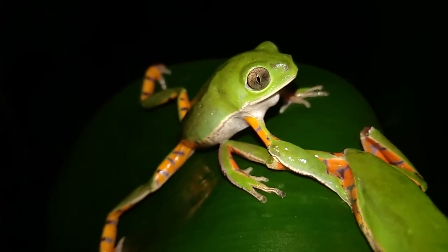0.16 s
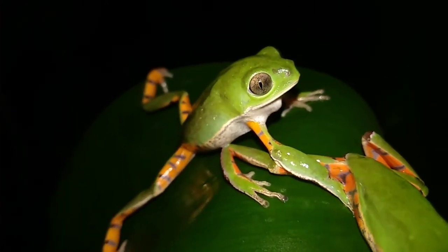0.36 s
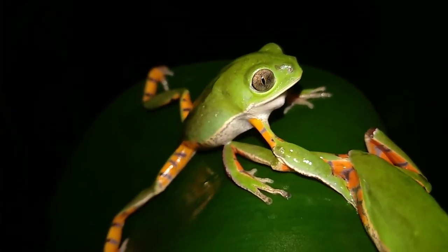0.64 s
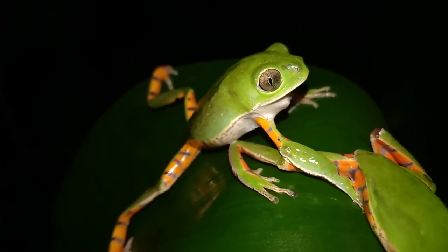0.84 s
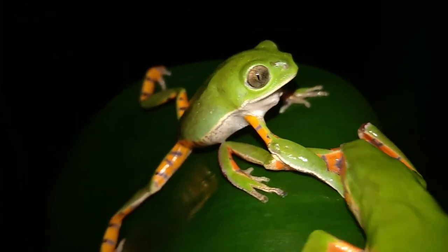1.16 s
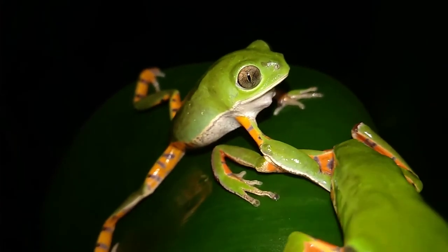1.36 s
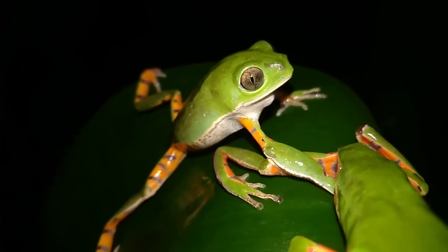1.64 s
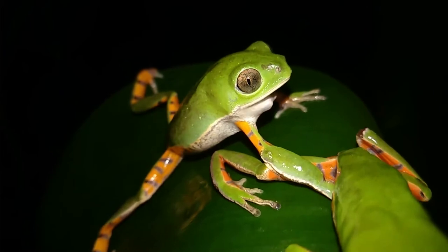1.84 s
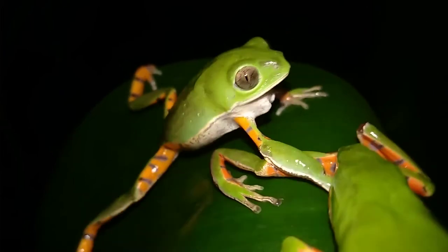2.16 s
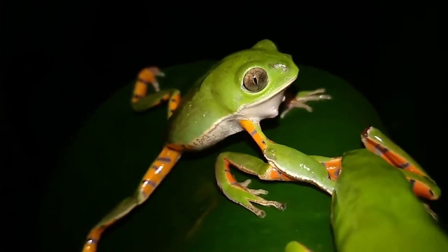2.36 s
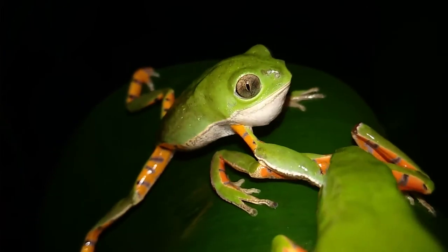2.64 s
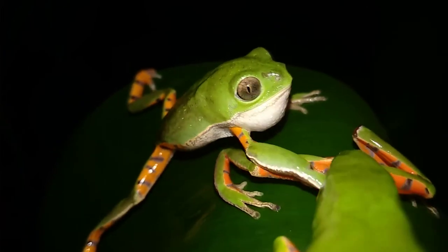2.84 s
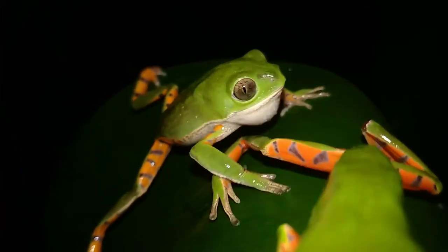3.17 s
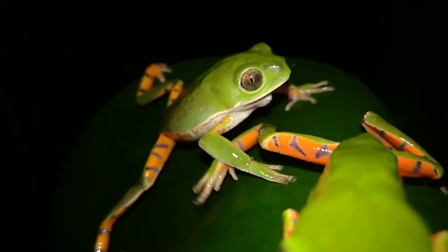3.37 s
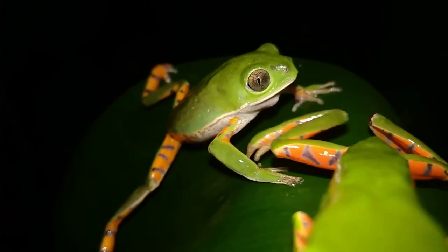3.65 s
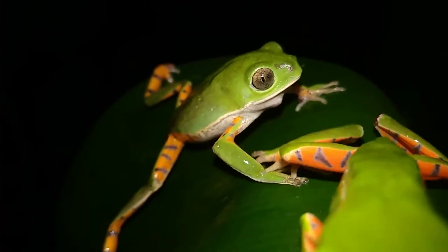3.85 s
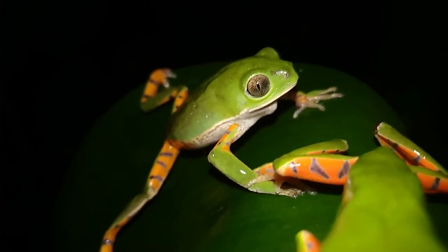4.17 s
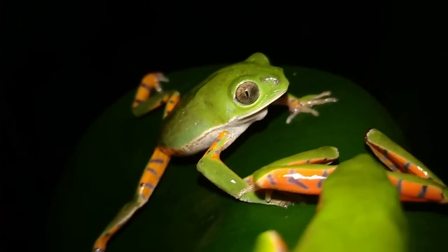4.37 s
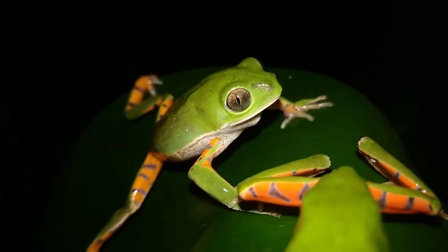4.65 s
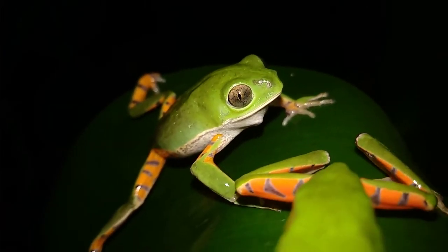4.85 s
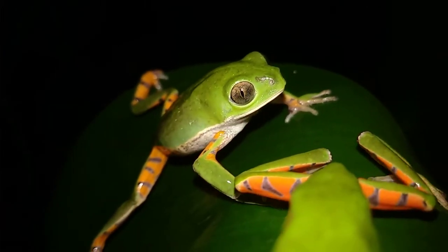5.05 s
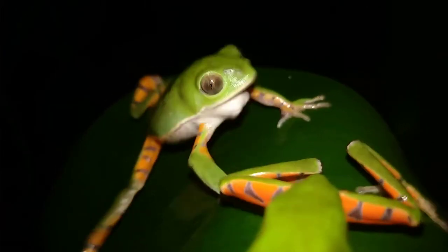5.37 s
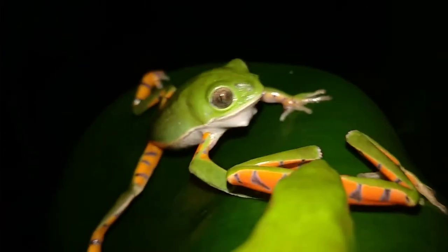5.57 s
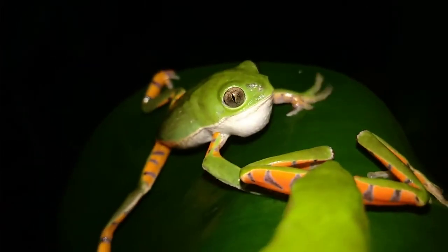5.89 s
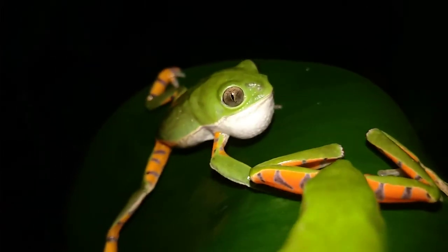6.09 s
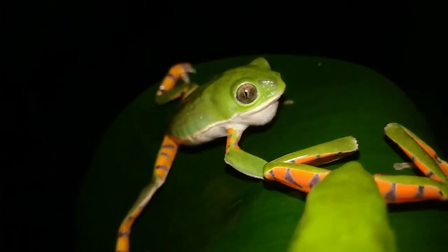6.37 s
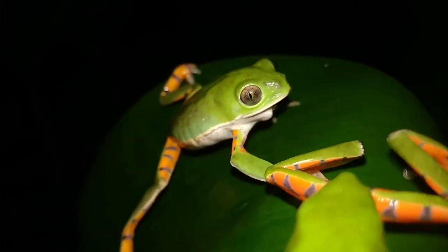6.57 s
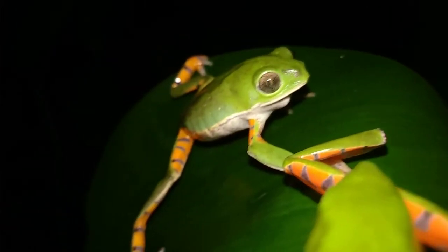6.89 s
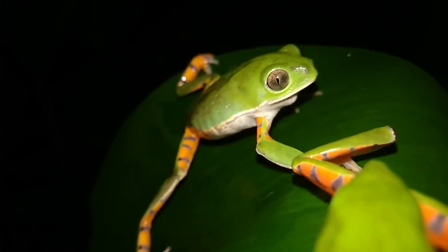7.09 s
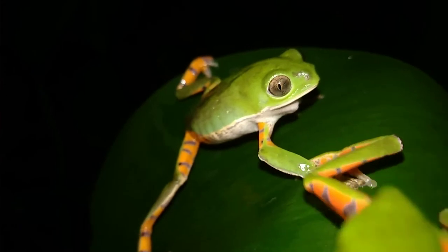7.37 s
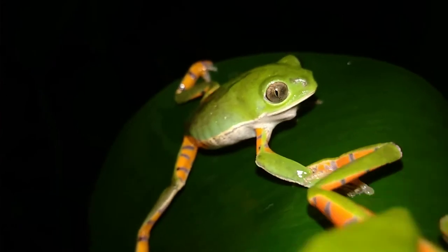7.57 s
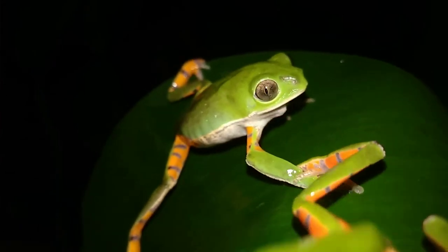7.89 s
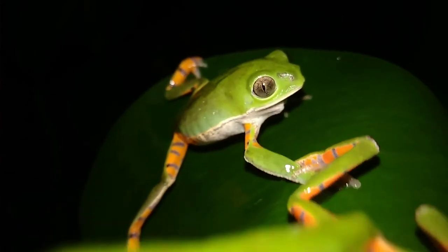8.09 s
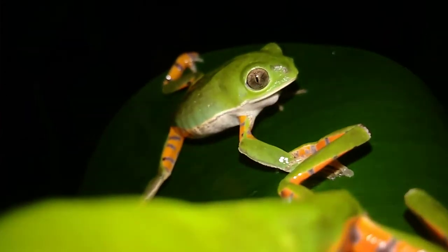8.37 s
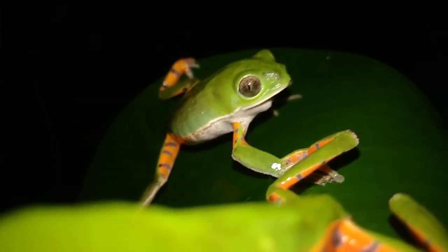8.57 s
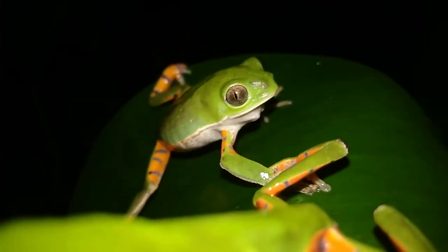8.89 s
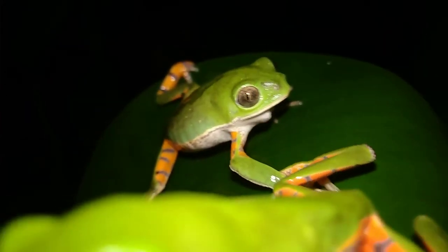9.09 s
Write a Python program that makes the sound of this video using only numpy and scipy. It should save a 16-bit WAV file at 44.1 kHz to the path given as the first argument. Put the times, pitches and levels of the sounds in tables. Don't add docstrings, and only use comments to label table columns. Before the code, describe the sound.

A thin, steady insect buzz fills the night while a katydid hisses in airy bursts from the left. A near frog repeats very short, dry, rattling croaks, eleven in all, well under a second apart at first. Faint echoing chirps come from frogs far to the left. A tree frog on the right answers with two rolling trills, the second louder. Leaves rustle lightly in the third second. Stereo outdoor pickup, faint hiss.

```python
import sys
import numpy as np
from scipy import signal
from scipy.fft import rfft, irfft
from scipy.io import wavfile
from scipy.ndimage import uniform_filter1d

SR = 44100
rng = np.random.default_rng(int(sys.argv[2]) if len(sys.argv) > 2 else 0)


def int16_out(signal):
    q = np.round(np.clip(np.atleast_2d(signal).T, -1, 1) * 32767)
    wavfile.write(sys.argv[1], SR, q.astype(np.int16))


def volts(x):
    e = np.asarray(x, float) / 20
    return 10 ** e


N = 407043
TIME = np.arange(N) / SR
OPPOSITE = np.array([[1], [-1]])

# frequency in Hz, density in dB per Hz.
AIR_SPECTRUM = [(28, -30), (55, 5.5), (110, -2.5), (650, -15.5), (1600, -21.5), (4500, -20), (8330, -18.5),
                (15500, -30.5)]
# time in seconds, level in dB.
ENGINE_LEVEL = [(0.0, -79), (2.4, -70.5), (4.5, -70), (5.2, -75.5), (9.23, -104)]
# time in seconds, wing strokes per second.
WING_RATE = [(0.0, 157.8), (1.5, 156.33), (2.5, 155.99), (3.5, 156.32), (4.0, 156.9), (4.5, 158.46),
             (5.0, 159.1), (5.5, 159.33), (6.3, 158.95), (8.0, 156.91), (9.0, 156.24), (9.23, 156.23)]
# time in seconds, level in dB.
BUZZ_LEVEL = [(0.0, -53.5), (1.49, -51.5), (4.47, -52.5), (4.52, -48.5), (4.86, -54), (6.66, -49.5),
              (7.1, -55), (7.4, -51), (9.15, -52.5), (9.23, -53.5)]
# frequency in Hz, density in dB per Hz.
WING_SPECTRUM = [(3350, -40), (5700, -30.5), (6350, -8), (6800, -1.5), (7000, -2), (7500, -6), (8200, -39),
                 (12000, -51.5)]
# start in seconds, peak level in dB, pitch in Hz, left minus right in dB.
LOW_CALLS = [(0.025, -75.5, 803, 2), (1.385, -73, 860, 1.8), (1.679, -79, 817, 2), (1.898, -75, 848, 2),
             (3.532, -74, 920, 1.8), (4.385, -69.5, 870, 2.6), (5.062, -85, 876, 2), (6.818, -77, 912, 3.2),
             (7.949, -78, 850, 1.6)]
# start in seconds, peak level in dB, pitch in Hz, left minus right in dB.
CHIRP_CALLS = [(0.548, -50, 2900, 13), (1.172, -52, 2890, 17), (1.862, -52.5, 2900, 16.5),
               (2.463, -46, 2900, 9), (3.595, -50.5, 2920, 14), (4.13, -52.5, 2930, 16),
               (4.82, -50, 2970, 11), (5.655, -50, 2850, 12), (6.27, -50, 2938, 8), (6.77, -49, 2920, 10),
               (7.135, -51.5, 2920, 13), (7.642, -50, 2880, 13), (8.65, -49.5, 2910, 12),
               (9.115, -50, 2930, 11)]
# start in seconds, peak level in dB, pitch in Hz, left minus right in dB.
MIDDLE_CALLS = [
    (6.8286, -55.5, 2140, 13),
    (9.1499, -51.5, 2115, 11),
]
# start in seconds, length in seconds, level in dB.
KATYDID_BURSTS = [(0.047, 0.41, -54), (0.763, 0.43, -53.5), (1.477, 0.31, -55), (2.1, 0.48, -53.5),
                  (2.856, 0.35, -53), (3.47, 0.25, -53.5), (4.057, 0.24, -53.5), (4.667, 0.34, -58),
                  (5.214, 0.43, -54), (5.907, 0.44, -53.5), (6.657, 0.28, -54.5), (7.267, 0.39, -54),
                  (8.003, 0.47, -54.5), (8.804, 0.35, -54.5)]
# frequency in Hz, density in dB per Hz.
FILE_SPECTRUM = [(5290, -74), (9000, -17.5), (10700, -9), (12100, 4), (12700, 4.5), (14300, -4),
                 (15300, -25), (15500, -39)]
# first pulse in seconds, last pulse in seconds, hum level in dB, snap level in dB.
CROAK_SERIES = [(0.164, 0.2352, -25, -15.5), (0.7986, 0.901, -24.5, -18), (1.5103, 1.619, -25.5, -17.5),
                (2.1817, 2.295, -25, -16.5), (3.15, 3.2782, -24.5, -17), (3.849, 3.9798, -25, -16.5),
                (4.516, 4.6632, -24.5, -16.5), (5.1994, 5.344, -24.5, -17.5), (6.4205, 6.5634, -24, -18),
                (7.293, 7.437, -24, -18), (8.1339, 8.2623, -23.5, -18)]
# frequency in Hz, level in dB.
SAC_PARTIALS = [(740, -19), (992, 1.5), (1130, -8.5), (1360, -11), (1752, -19), (2620, -12), (3410, -16.5)]
# delay after the pulse in ms, frequency in Hz, length in ms, level in dB,
# pitch fall per length as a fraction.
FOLD_MODES = [
    (3.4, 1380, 3, -8, -.1),
    (3.2, 1780, 2.6, -8, -.04),
    (4.8, 3200, 2.1, 2, .18),
    (5.2, 2650, 2.2, -8, .04),
    (4.3, 4000, 1.2, -9, .05),
    (4.2, 5200, 1.2, -23, .05),
]
# delay in ms, level in dB.
SLAP_ARRIVALS = [
    [(.73, 0), (6.9, -6), (13, -12)],
    [(.05, -4), (5.7, -8), (12.1, -14)],
]
# frequency in Hz, density in dB per Hz.
RASP_SPECTRUM = [(1000, -10), (1350, 15), (1900, 9.5), (2250, 1), (2650, -10), (3300, -4), (4200, 3),
                 (5800, -26)]
# start in seconds, peak level in dB, length in seconds.
DULL_BRUSHES = [(1.399, -61, 0.057), (1.649, -60, 0.043), (2.649, -61, 0.089), (2.808, -59, 0.052),
                (2.922, -60, 0.059), (3.108, -61.5, 0.1), (3.249, -51, 0.042), (3.329, -63.5, 0.12),
                (3.8, -64, 0.15), (3.919, -64, 0.046), (6.553, -61, 0.046), (7.399, -56.5, 0.057),
                (7.969, -65, 0.045)]
# start in seconds, peak level in dB, length in seconds.
BRIGHT_BRUSHES = [(2.493, -64, 0.028), (2.67, -61, 0.13), (3.135, -52, 0.033), (3.225, -49.5, 0.075),
                  (3.348, -51, 0.056), (3.5214, -53, 0.042), (3.667, -49.5, 0.05), (3.793, -62, 0.07)]
# start in seconds, peak level in dB.
LEAF_TICKS = [
    (5.37, -44),
    (8.684, -51.5),
]
# start in seconds, loudest moment in seconds, end in seconds, top level in dB,
# sag to the end in dB.
TRILL_SERIES = [
    (2.302, 2.566, 3.1, -31, -8),
    (5.473, 5.912, 6.262, -28, -2.5),
]
# frequency in Hz, ring time in ms, level in dB.
THROAT_MODES = [(1988, 0.75, 11), (1656, 1.17, -6.5), (2200, 0.37, -12), (2900, .8, -18), (3887, 0.52, -3),
                (4120, 0.47, -7), (4990, 0.51, -15.5), (5700, 0.53, -11)]
# delay in ms, level in dB.
TRILL_ARRIVALS = [
    [(.6, -6.5), (3.1, -17.5), (5.5, -26.5)],
    [(0, 5), (2.4, -26.5), (4.6, -64.5)],
]


def unit(x):
    return x / np.sqrt(np.mean(x ** 2))


def curve(table):
    s, value = np.transpose(table)
    return np.interp(TIME, s, value)


def colour(x, points):
    hz, db = np.transpose(points)
    size = x.shape[-1]
    bins = np.log(np.arange(size // 2 + 1) * SR / size + 1)
    return irfft(rfft(x) * volts(np.interp(bins, np.log(hz), db, left=-90, right=-90)), size)


def noise():
    return rng.standard_normal((2, N))


def walk(rate):
    k = int(SR / rate)
    held = np.repeat(rng.standard_normal(N // k + 1), k)
    return 1.365 * uniform_filter1d(uniform_filter1d(held, k), k)[:N]


def spikes(times, sizes):
    at = np.clip((np.asarray(times) * SR).astype(int), 0, N - 1)
    return np.bincount(at, sizes, N)


def ring(x, response):
    return signal.oaconvolve(np.atleast_2d(x), np.atleast_2d(response), axes=-1)[:, :N]


def paths(ears):
    responses = []
    for ear in ears:
        ms, db = np.transpose(ear)
        responses.append(spikes(ms / 1000, volts(db))[:SR // 50])
    return responses


def foliage(t60, lo_hz, hi_hz, onset_s):
    t = np.arange(SR // 2) / SR
    band = [(lo_hz / 2, -20), (lo_hz, -3), (hi_hz, 0), (2 * hi_hz, -20)]
    tail = colour(rng.standard_normal((2, len(t))), band)
    tail = tail * volts(-60 * t / t60) * (1 - np.exp(-t / onset_s))
    return tail / np.sqrt(np.sum(tail ** 2) / 2)


def air():
    murmur = 0
    for hz in 30 * 2 ** np.arange(0, 9.1, .5):
        mid, side = colour(noise(), [(hz * 2 ** -.5, -12), (hz, 0), (hz * 2 ** .5, -12)])
        apart = np.clip(0.21 + hz / 1500, 0, 1)
        murmur = murmur + volts(1.58 * walk(6)) * (mid + apart * side * OPPOSITE)
    murmur = unit(colour(murmur, AIR_SPECTRUM)) * volts(-63.5 + 3.0)
    drone = volts(curve(ENGINE_LEVEL) + 4.5) * np.sin(2 * np.pi * 174 * TIME + 1.34 * walk(2.5))
    mains = volts(-71 + walk(6.6)) * np.sin(2 * np.pi * 59 * TIME + 2.1 * walk(1.9))
    chorus_hz, chorus_db = 2920, -69.5
    chorus = unit(colour(noise(), [(chorus_hz - 450, -18), (chorus_hz, 0), (chorus_hz + 400, -18)]))
    return murmur + chorus * volts(chorus_db + 0.83 * walk(12)) + drone + mains


def buzzer():
    phase = 2 * np.pi * np.cumsum(curve(WING_RATE)) / SR
    pan_db = 3 + 0.6 * walk(2.7)
    lines = np.zeros((2, N))
    for ear in range(2):
        for k in range(37, 53):
            fading = volts(3.04 * walk(5) + 2.2 * walk(30))
            lines[ear] += fading * np.sin(k * phase + 1.62 * walk(6) + .3 * k ** 2)
    others = noise() * volts(1.3 * walk(5.7))
    both = unit(colour(lines, WING_SPECTRUM)) + volts(-7.0) * unit(colour(others, WING_SPECTRUM))
    return unit(both) * volts(curve(BUZZ_LEVEL) + 2.5 + 0.47 * walk(7) + OPPOSITE * pan_db / 2)


def far_frog(calls, period, pulses, width_hz, t60, wet_db, gain_db, rise=0.):
    t = np.arange(SR // 30) / SR
    long = np.arange(SR // 4) / SR
    beat = 4 * width_hz * t * np.exp(-4 * width_hz * t)
    k = np.arange(pulses)
    out = np.zeros((2, N))
    for s, db, hz, pan_db in calls:
        late, uneven = rng.standard_normal((2, pulses))
        size = np.sin(np.pi * (k + 1) / (pulses + 1)) ** 0.22 * volts(db + gain_db + 0.81 * uneven)
        train = spikes(period * (k + .5 + 0.1 * late), size)[:SR // 4]
        beats = np.convolve(train, beat)[:len(long)]
        warble = .06 * walk(420)[:len(long)]
        glide = 1.02 - rise * np.exp(-long / 0.0201) + warble
        voice = 2 * beats * np.sin(2 * np.pi * hz * np.cumsum(glide) / SR)
        at = int(s * SR)
        out[:, at:at + len(voice)] += volts(OPPOSITE * pan_db / 2) * voice[:N - at]
    tail = foliage(t60, 500, 6800, onset_s=0.0045)
    wet = np.vstack([ring(out[ear], tail[ear]) for ear in range(2)])
    return 1.06 * out + volts(wet_db) * wet


def katydid():
    rise_s, fall_s, rest_db = 0.053, 0.085, -71.5
    swells = []
    for s, length, top_db in KATYDID_BURSTS:
        knots = [s - rise_s, s, s + 0.46 * length, s + length, s + length + fall_s]
        swells.append(np.interp(TIME, knots, [rest_db, top_db - 6.5, top_db, top_db - 7, rest_db]))
    db = np.max(swells, axis=0)
    teeth = noise() * volts(0.68 * walk(300))
    return unit(colour(teeth, FILE_SPECTRUM)) * volts(db + 0.37 * walk(15) + np.array([[5.5], [-4.5]]))


def sac_hum(ms):
    rise_ms, cut_ms, fall_ms, left_db = 8, 1.8, 4, -1
    tone = sum(volts(db) * np.sin(2 * np.pi * hz * ms / 1000 + k) for k, (hz, db) in enumerate(SAC_PARTIALS))
    u = ms - cut_ms
    swell = np.exp(-(u / np.where(u < 0, rise_ms, fall_ms)) ** 2) * np.clip((ms - ms[0]) / 3, 0, 1)
    hum = tone * swell * volts(OPPOSITE * left_db / 2)
    hum[1] = np.roll(hum[1], 3)
    return hum


def fold_slap(ms):
    at, hz, length, db, fall = np.transpose(FOLD_MODES)[:, :, None]
    u = ms - at
    burst = volts(db) * np.exp(-(2 * u / length) ** 2)
    return burst * np.cos(2 * np.pi * hz * (u - fall * u ** 2 / length) / 1000)


def near_frog():
    ms = np.arange(-12 * SR // 1000, 24 * SR // 1000) / SR * 1000
    pulse_s, first_db, last_db, last_snap_db = .0184, -2, -2, -8
    hums, slaps = np.zeros(N), np.zeros((len(FOLD_MODES), N))
    for first, last, hum_db, snap_db in CROAK_SERIES:
        k = np.arange(int(round((last - first) / pulse_s)) + 1)
        late, hum_chance, snap_chance, *mode_chances = rng.standard_normal((3 + len(FOLD_MODES), len(k)))
        place = k - .14 * (1 - np.exp(-k / 1.5))
        times = first + (last - first) * place / place[-1] + ms[0] / 1000 + .00012 * late
        ends_db = first_db * (k == 0) + last_db * (k == k[-1])
        hums += spikes(times, volts(hum_db + ends_db + 0.97 * hum_chance))
        soft_start_db = -5.6 * np.exp(-(k / 1.06) ** 2)
        size_db = snap_db + ends_db + last_snap_db * (k == k[-1]) + soft_start_db + 1.05 * snap_chance
        for mode, own in enumerate(mode_chances):
            slaps[mode] += spikes(times, volts(size_db + 1.3 * own))
    u = np.clip(ms - 3, 0, None)
    puffs = ring(slaps.mean(axis=0), u / (u + 1.32) * np.exp(-u / 9.7))
    rasp = volts(-7.5) * puffs * unit(colour(noise(), RASP_SPECTRUM))
    snaps = ring(ring(slaps, fold_slap(ms)).sum(axis=0), paths(SLAP_ARRIVALS))
    direct = ring(hums, sac_hum(ms)) + snaps + rasp
    close = volts(-18.5) * foliage(0.049, 1900, 4400, onset_s=0.00089)
    wide = volts(-27.5) * foliage(0.36, 1430, 5200, onset_s=0.011)
    return direct + ring(direct[0], close + wide)


def leaves(events, points, gain_db, alike, spread=0.66):
    shape = np.zeros(N)
    for s, db, length in events:
        width = max(spread * length, .0005)
        shape += volts(db + gain_db) * np.exp(-((TIME - s - length / 2) / width) ** 2)
    mid, side = noise() * volts(2.2 * walk(150))
    return unit(colour(mid + (1 - alike) * side * OPPOSITE, points)) * shape


def tree_frog():
    ms = np.arange(SR // 40) / SR * 1000
    onset = 1 - np.exp(-(ms / 1.068) ** 2)
    start_db, stop_s = -9, 0.019
    full_rate, rate_lag, rate_creep = 117, 27, 2
    voice = np.zeros(N)
    for start, top, end, top_db, sag_db in TRILL_SERIES:
        u = np.clip((TIME - start) / (top - start), 0, 1)
        rate = full_rate - rate_lag * (1 - u) ** 1.4 + rate_creep * np.clip(TIME - top, 0, 1)
        stop = end + stop_s / 2
        db = top_db + np.interp(TIME, [start, top, end - stop_s, stop], [start_db, 0, sag_db, sag_db - 13])
        cycles = np.cumsum(rate * (TIME > start) * (TIME < stop) / SR)
        at = np.flatnonzero(np.diff(np.ceil(cycles)))
        for i, (late, size, pitch) in zip(at, rng.standard_normal((len(at), 3))):
            tight = 1 + 0.033 * ((i / SR - start) / (end - start) - .5) + .006 * pitch
            pulse = sum(volts(gain_db) * np.exp(-ms / tau) * np.sin(2 * np.pi * hz * tight * ms / 1000)
                        for hz, tau, gain_db in THROAT_MODES)
            scatter_db = np.clip(.5 - 0.2 * (db[i] + 31), .4, 2.5)
            j = i + int(4 * late)
            voice[j:j + len(ms)] += volts(db[i] + 17 + scatter_db * size) * pulse * onset
    voice = signal.sosfilt(signal.butter(3, 1400, "high", fs=SR, output="sos"), voice)
    scatter = ring(voice, foliage(0.045, 930, 4600, onset_s=0.0013))
    return ring(voice, paths(TRILL_ARRIVALS)) + volts(-16) * scatter


def scene():
    low = far_frog(LOW_CALLS, 0.021, pulses=5, width_hz=60, t60=0.11, wet_db=-4.5, gain_db=14.0)
    chirps = far_frog(CHIRP_CALLS, 0.0079, pulses=10, width_hz=100, t60=0.72, wet_db=-6, gain_db=-2, rise=0.127)
    middle = far_frog(MIDDLE_CALLS, 0.0056, pulses=12, width_hz=250, t60=0.36, wet_db=-3.5, gain_db=-2.5, rise=-.2)
    dull_band = [(220, -37), (370, 0.5), (520, -0.5), (900, -6.5)]
    dull = leaves(DULL_BRUSHES, dull_band, gain_db=-2, alike=0.76, spread=1.0)
    bright_band = [(4000, -14), (8500, 6), (11000, 8.0), (15500, -15)]
    bright = leaves(BRIGHT_BRUSHES, bright_band, gain_db=-2, alike=0.1)
    tick_band = [(300, -13.0), (900, 0), (2500, -14), (5000, -30)]
    ticks = leaves([(s, db, .002) for s, db in LEAF_TICKS], tick_band, gain_db=-2.5, alike=0.4)
    frogs = low + near_frog() + chirps + tree_frog() + middle
    return air() + buzzer() + katydid() + frogs + dull + bright + ticks


def low_pass(x):
    return signal.sosfilt(signal.butter(12, 15650, fs=SR, output="sos"), x)


def record(dry):
    return low_pass(dry)


dry = scene()
out = record(dry)
int16_out(out)
```